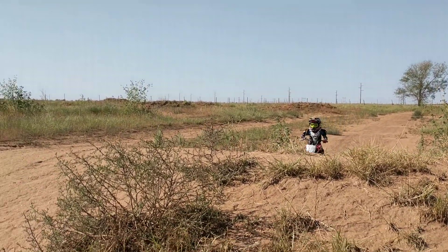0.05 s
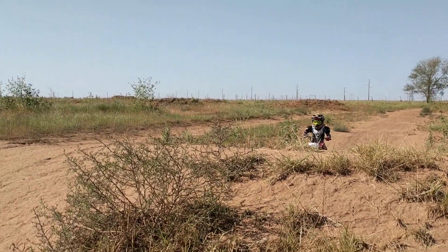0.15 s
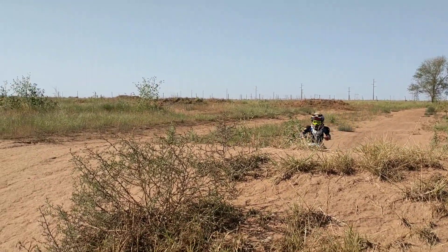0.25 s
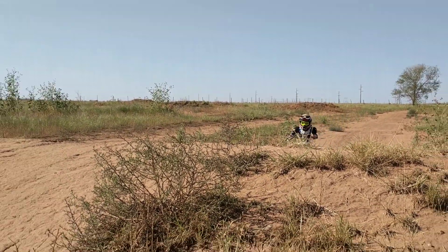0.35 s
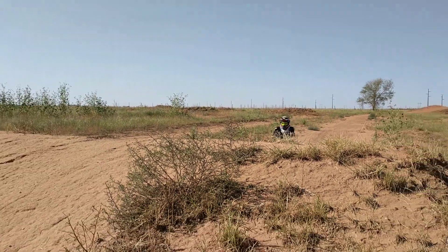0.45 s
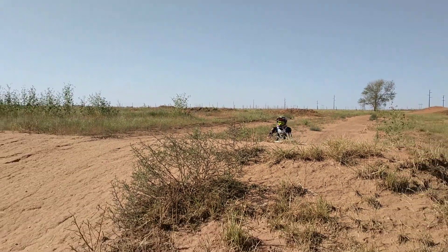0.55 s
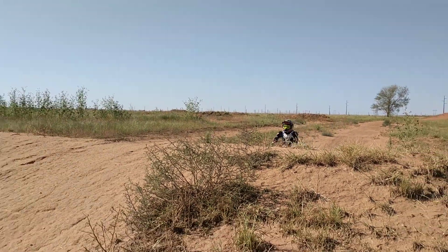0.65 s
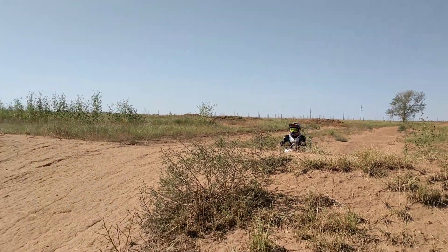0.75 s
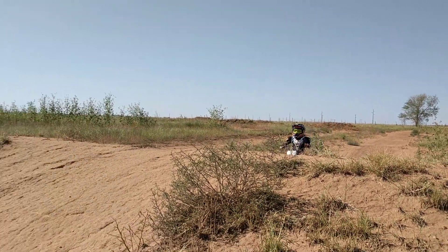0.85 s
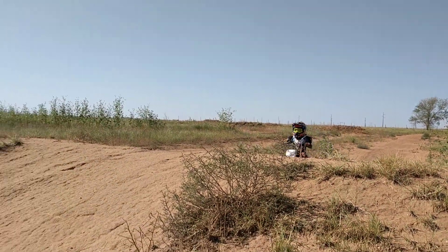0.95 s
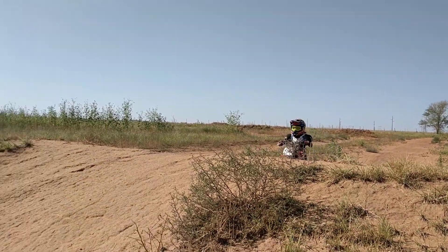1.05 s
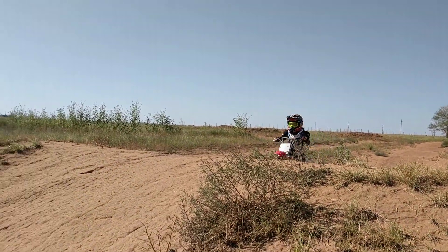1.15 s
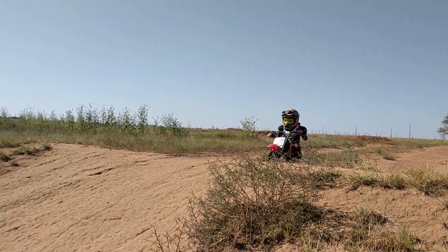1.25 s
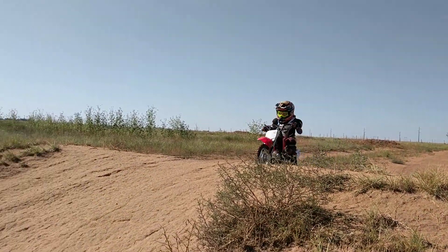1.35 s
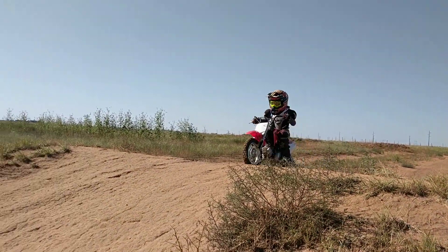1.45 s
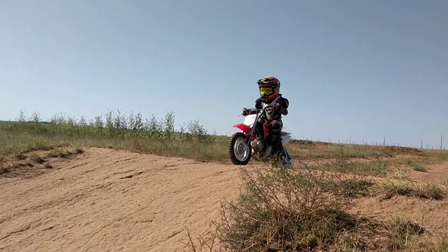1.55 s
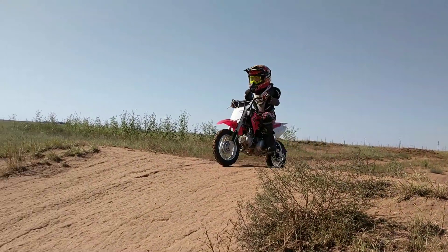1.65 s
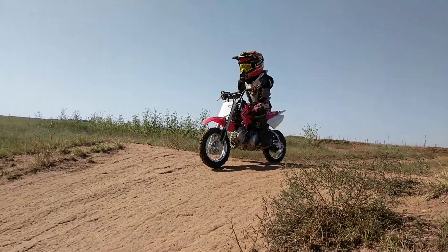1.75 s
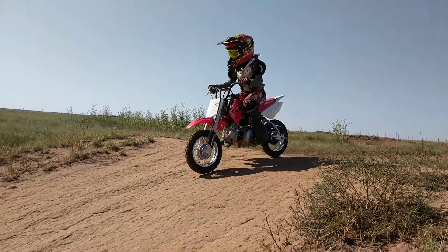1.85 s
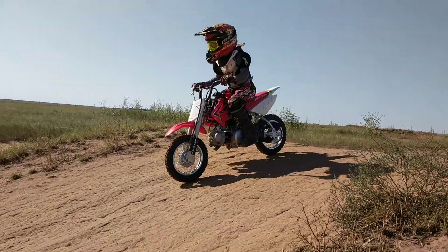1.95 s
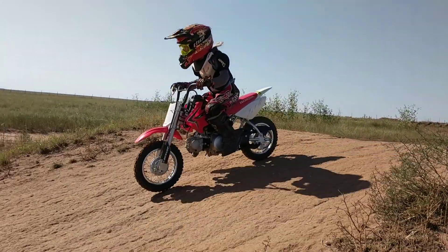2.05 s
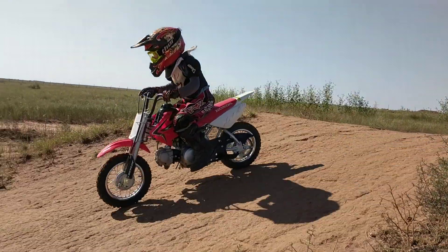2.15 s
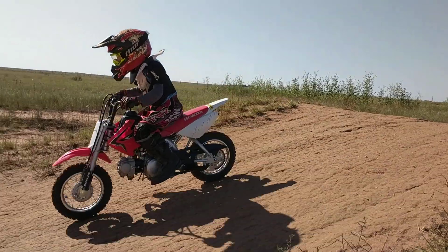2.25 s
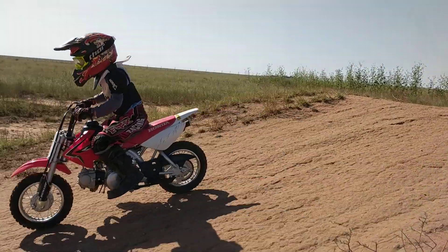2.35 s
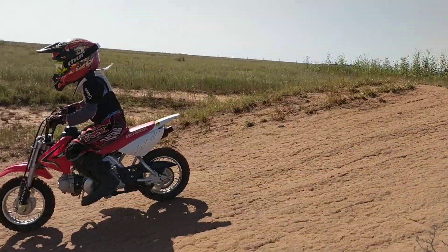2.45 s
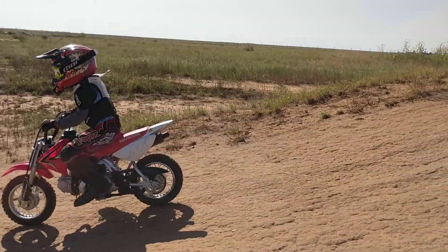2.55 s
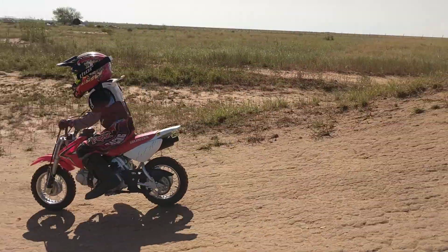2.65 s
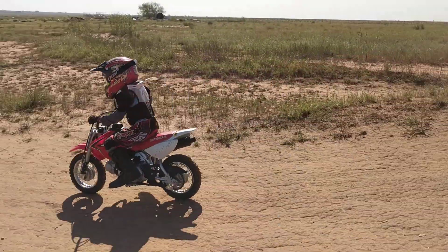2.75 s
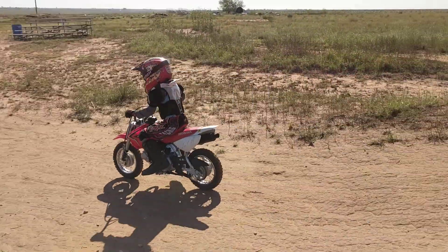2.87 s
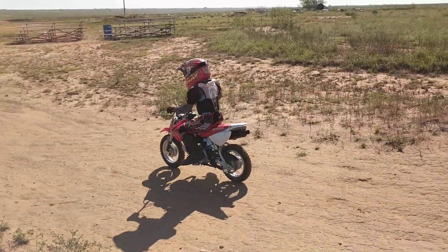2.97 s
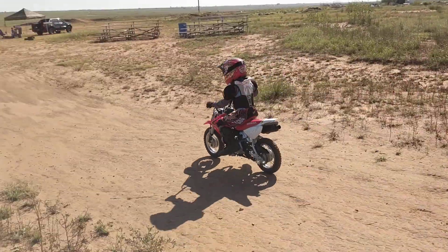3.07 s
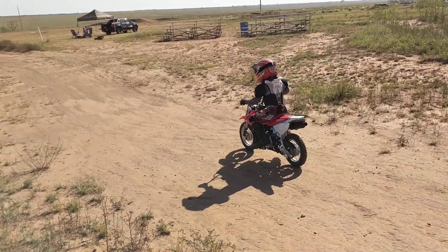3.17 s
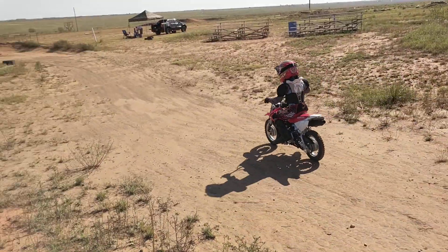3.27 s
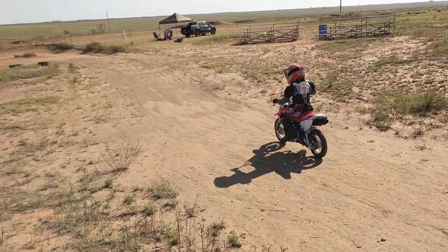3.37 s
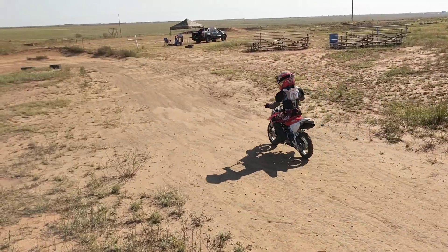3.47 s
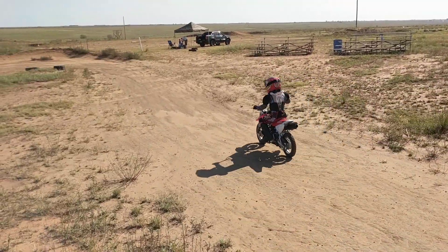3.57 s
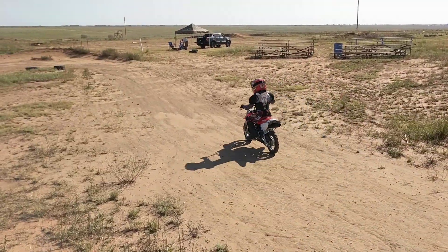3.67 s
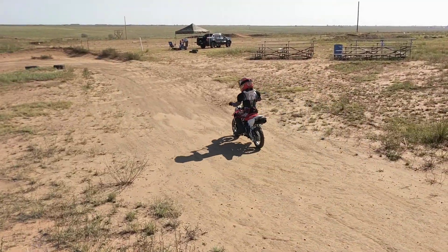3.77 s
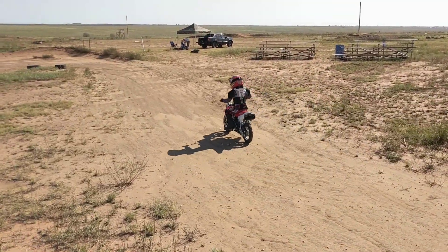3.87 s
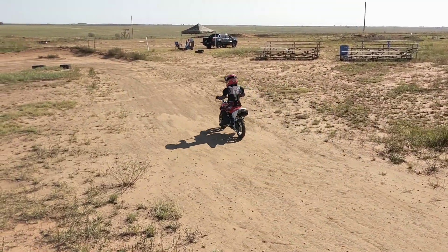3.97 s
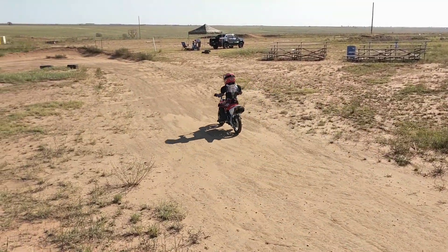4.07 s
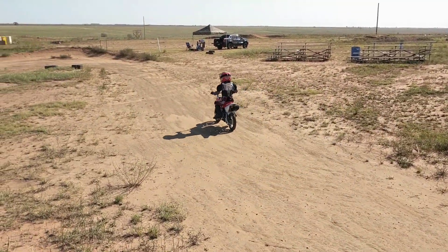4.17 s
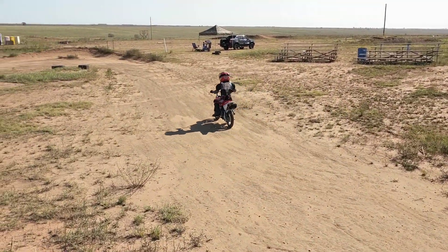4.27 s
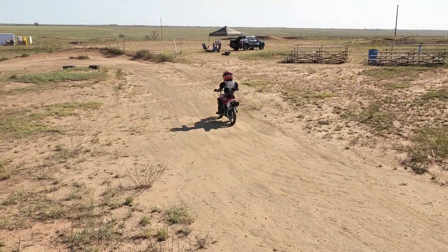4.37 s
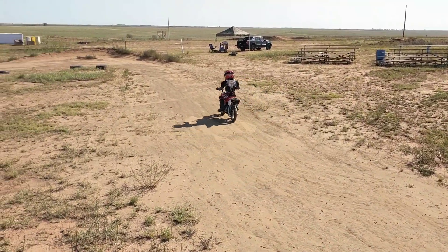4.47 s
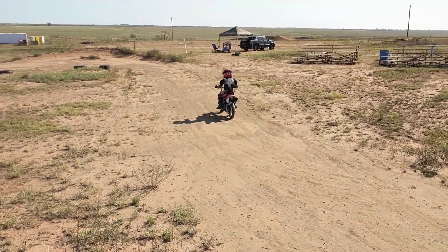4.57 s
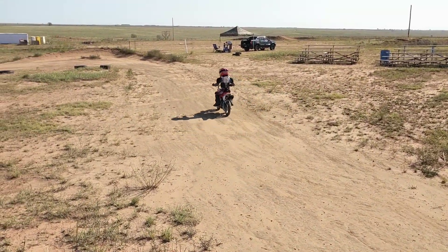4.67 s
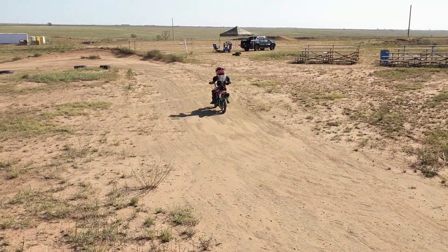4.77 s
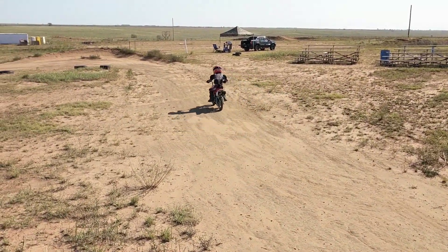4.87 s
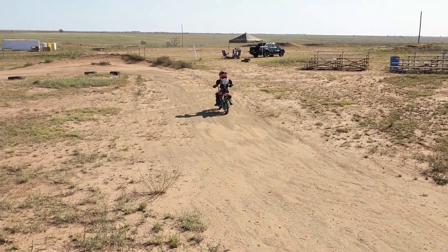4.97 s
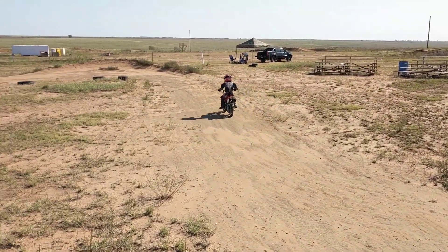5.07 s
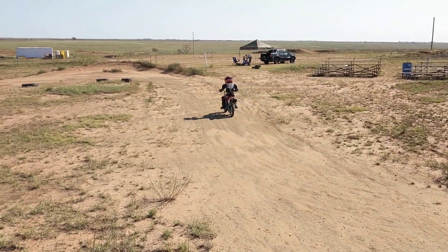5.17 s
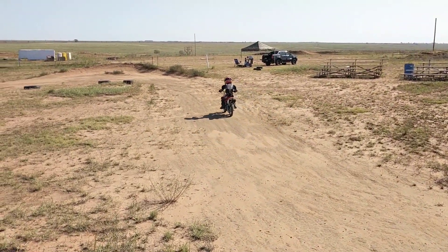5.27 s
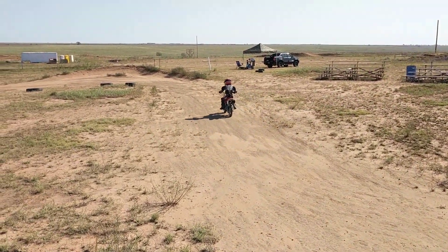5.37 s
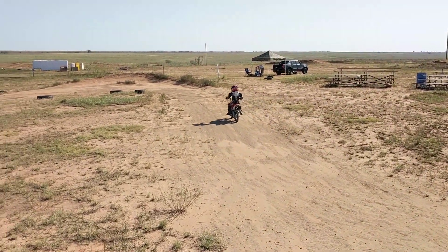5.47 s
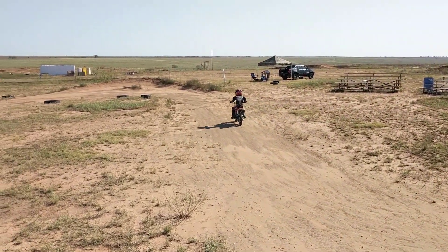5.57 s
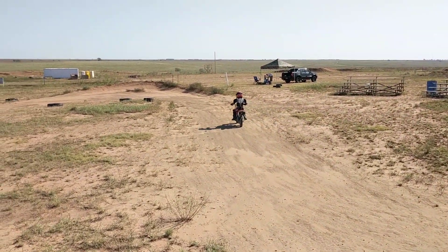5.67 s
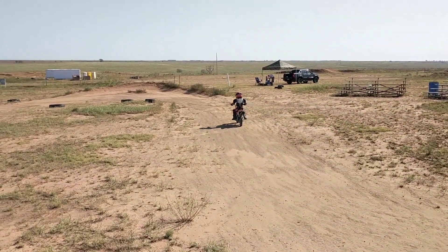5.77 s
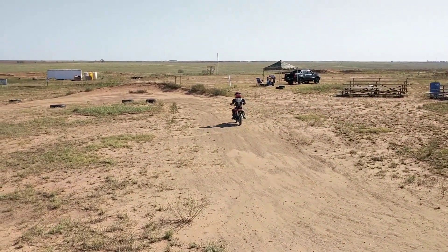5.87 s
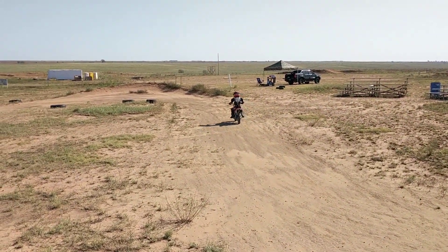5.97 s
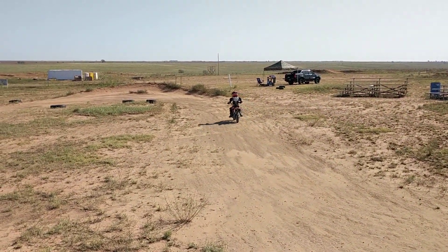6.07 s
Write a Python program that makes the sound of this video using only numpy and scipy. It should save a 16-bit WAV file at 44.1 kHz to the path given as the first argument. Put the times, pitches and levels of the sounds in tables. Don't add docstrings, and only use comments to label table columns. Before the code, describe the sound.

Outdoors on an open dirt track, a small four-stroke bike approaches with a low, fluttering boom, briefly barking under throttle. Its pitch sags as it tops the rise, then metal ring, valve clatter, chain and tyre hiss swell close by around two and a half seconds. It coasts away, slowing and misfiring, with a small late throttle blip. Wind rumbles and thumps on the handheld microphone, much heavier after the pass.

```python
import sys
import numpy as np
from scipy import signal
from scipy.fft import rfft, irfft, next_fast_len
from scipy.io import wavfile
from scipy.ndimage import uniform_filter1d, map_coordinates

SR = 44100
rng = np.random.default_rng(int(sys.argv[2]) if len(sys.argv) > 2 else 0)


def generate_wav(sig):
    pcm = np.round(np.clip(np.atleast_2d(sig).T, -1, 1) * 32767).astype(np.int16)
    wavfile.write(sys.argv[1], SR, pcm)


def ratio_of_db(decibels):
    return 10 ** (np.asarray(decibels, float) / 20)


N = 269875
T = np.arange(N) / SR


def unit(x):
    return x / np.sqrt(np.mean(x ** 2) + 1e-20)


def curves(rows):
    s, *cols = np.transpose(rows)
    return [np.interp(T, s, c) for c in cols]


def peaks(rows):
    levels = []
    for start, end, db, rise, fall in rows:
        levels.append(db - rise * np.maximum(start - T, 0) - fall * np.maximum(T - end, 0))
    return np.max(levels, axis=0)


def wobble(rate_hz):
    knots = rng.standard_normal(int(N * rate_hz / SR) + 4)
    return map_coordinates(knots, [np.arange(N) * rate_hz / SR])


def filtered(x, response):
    m = next_fast_len(N + SR // 2, True) // 2 * 2
    return irfft(rfft(x, m) * response(np.fft.rfftfreq(m, 1 / SR)), m)[:N]


def low_pass(x, hz, order):
    return filtered(x, lambda f: 1 / (1 + (f / hz) ** order))


def high_pass(x, hz, order):
    return filtered(x, lambda f: 1 / (1 + (hz / (f + 1)) ** order))


def modes(rows):
    def response(f):
        total = 0
        for k, (hz, width, db) in enumerate(rows):
            damping = 1j * f * width
            total = total + (-1) ** k * ratio_of_db(db) * damping / (hz * hz - f * f + damping)
        return total
    return response


def steep(hz, width_hz):
    return lambda f: modes([(hz, width_hz, 0)])(f) ** 2


def causal(points):
    def response(f):
        hz, db = np.transpose(points)
        cep = irfft(np.log(ratio_of_db(np.interp(np.log(f + 1), np.log(hz + 1), db)) + 1e-6))
        cep[1:len(cep) // 2] *= 2
        cep[len(cep) // 2 + 1:] = 0
        return np.exp(rfft(cep))
    return response


def noise(response):
    return unit(filtered(rng.standard_normal(N), response))


def patchy(x, depth_db):
    z = signal.stft(x, nperseg=512)[2]
    field = uniform_filter1d(rng.standard_normal(z.shape), size=6, axis=0)
    field = uniform_filter1d(field, size=8, axis=1)
    return unit(signal.istft(z * ratio_of_db(depth_db * unit(field)), nperseg=512)[1][:N])


def train(times, delay, jitter, scatter_db, level_db=0):
    chance = rng.standard_normal((len(times), 2))
    at = np.round((times + delay + jitter * chance[:, 0]) * SR).astype(int)
    return np.bincount(at, ratio_of_db(level_db + scatter_db * chance[:, 1]), N + SR)[:N]


def burst(pulses, rise, t60):
    t = np.arange(SR // 16) / SR
    shape = ratio_of_db(-60 * t / t60) * (1 - np.exp(-t / rise))
    return signal.oaconvolve(pulses, shape * np.sqrt(SR / 40) / np.linalg.norm(shape))[:N]


def struck(times, rows, delay, rise, t60, scatter_db, level_db):
    total = 0
    for hz, width_hz, db in rows:
        part = burst(train(times, delay, 0.00024, scatter_db, level_db), rise, t60)
        total = total + ratio_of_db(db) * filtered(part * rng.standard_normal(N), steep(hz, width_hz))
    return unit(total)


# t/s, firing rate/Hz
SPEED = [(0, 46.19), (.128, 45.94), (.192, 45.91), (.358, 50.25), (.524, 49.02), (.62, 47.04), (.76, 45.76),
         (.972, 42.76), (1.1, 44.17), (1.24, 43.05), (1.328, 41.4), (1.52, 39.15), (1.69, 38.99),
         (1.86, 36.55), (2.13, 41.46), (2.24, 42.32), (2.33, 41.47), (2.54, 44.6), (2.79, 45.28),
         (3.22, 42.48), (3.9, 37.91), (4.17, 33.09), (4.35, 30.79), (4.75, 30.01), (5.21, 28.3),
         (5.44, 32.81), (6.12, 28.49)]


def firings():
    turns = np.cumsum(curves(SPEED)[0]) / SR + .921
    return np.interp(np.arange(1, int(turns[-1]) + 1), turns, T)


# first t/s, last t/s, loss/dB
MISFIRES = [(.17, .17, 11.5), (.588, .588, 5), (.65, .65, 6), (.83, .83, 6), (.94, .94, 10),
            (1.17, 1.17, 4), (1.19, 1.19, 5), (2.24, 2.27, 7.5), (2.52, 2.55, 4), (2.73, 2.73, 2),
            (2.81, 2.81, 2), (3.445, 3.445, 4), (3.643, 3.643, 18), (3.668, 3.668, 3), (3.692, 3.692, 8),
            (3.743, 3.743, 5), (3.795, 3.795, 20), (3.9, 3.9, 8), (3.925, 3.925, 3), (3.954, 3.954, 8),
            (4.008, 4.008, 3), (4.066, 4.092, 10), (4.151, 4.185, 4), (4.213, 4.213, 10), (4.243, 4.275, 5),
            (4.309, 4.309, 3), (4.402, 4.402, 4), (4.468, 4.468, 22), (4.535, 4.535, 15), (4.568, 4.568, 4),
            (4.601, 4.601, 22), (4.634, 4.634, 12), (4.7, 4.735, 4), (4.8, 4.833, 16), (4.867, 4.867, 8),
            (4.969, 5.005, 3), (5.039, 5.039, 24), (5.073, 5.073, 4), (5.178, 5.178, 5), (5.214, 5.214, 20),
            (5.285, 5.285, 9), (5.627, 5.693, 10), (5.725, 5.725, 5), (5.757, 5.757, 10), (5.823, 5.856, 7),
            (5.956, 5.956, 4), (6.023, 6.058, 4)]


def misfires(times):
    return -sum(db * (times > a - .011) * (times < b + .011) for a, b, db in MISFIRES)


# t/s, gas heat (0-1), bark over boom/dB, bark edge/dB, clatter over hiss/dB
THROTTLE = [(0, 0, -14.5, 8, -1.5), (.12, 0.1, -6.5, 6, -2), (.19, 0.76, -4, 1.5, -18),
            (.44, 0.9, -1.5, -4, -21), (0.584, 0.1, -12.5, 2, -1.5), (1.09, 1, -8.5, -6, -3),
            (1.33, 0.97, -9.5, 4, -5.5), (1.739, 0.91, -9.5, 1, -5.5), (1.93, 0.97, -9.5, -13, -6),
            (2.279, 0.09, -15.5, -25, -6.5), (2.55, 0.02, -17.5, 0, -3.5), (3, 0.04, -22.5, 0, -1.5),
            (3.4, 0.07, -25, -20, -1), (4.3, 0.2, -39, -29, 1.5), (5.281, 0.5, -15, 0, 8),
            (5.6, 0, -16, -18, -5), (5.78, 0.58, -24, -1, 4)]


def throttle():
    grip_s = 0.02
    s, *cols = np.transpose(THROTTLE)
    now = np.clip(np.searchsorted(s, np.arange(N) / SR) - 1, 0, None)
    return [uniform_filter1d(c[now], size=round(grip_s * SR) + 1) for c in cols]


def late(f):
    from_hz, to_hz, lag_s = 200, 460, .006
    delay_s = np.interp(f, [from_hz, to_hz, 1.2 * to_hz], [-lag_s / 4, .6 * lag_s, lag_s / 6])
    return np.exp(-2j * np.pi * np.cumsum(delay_s) * f[1])


# t/s, level/dB
EXHAUST = [(0, -30.5), (.22, -36.5), (.4, -33.5), (.57, -43.5), (.6, -27), (1.06, -29), (1.09, -34.5),
           (1.27, -33.5), (1.34, -27.5), (1.9, -26.5), (2.16, -25.5), (2.27, -26), (2.288, -20), (3.3, -24),
           (4.1, -27), (5.2, -35), (5.32, -29.5), (6.12, -28.5)]
# f/Hz, level/dB
HOT = [(30, -56), (78, -7), (150, -12.5), (193, 0.5), (235, -19), (330, -9.5), (430, -9.5), (480, -20.5),
       (635, -11), (700, -20.5), (760, -18.5), (1000, -29), (1300, -31.5), (1900, -44.5), (2400, -45),
       (3500, -78)]
# f/Hz, level/dB
COOL = [(30, -41.5), (90, -11), (132, 0.5), (155, 6.5), (178, 3.5), (222, -11), (300, -15), (360, -15.5),
        (405, -19), (480, -38), (580, -37), (640, -41), (715, -29.5), (800, -47), (2000, -81.5)]


def exhaust(times):
    boom_db = curves(EXHAUST)[0]
    heat, bark_db, edge_db, _ = throttle()
    heat = np.clip(heat, 0, 1)
    pulses = train(times, delay=.0007, jitter=.00004, scatter_db=.6, level_db=.8 * misfires(times))
    hot, cool = causal(HOT), causal(COOL)
    total = 0
    for share, muffler in ((heat, hot), (1 - heat, lambda f: cool(f) * late(f))):
        wave = filtered(pulses, muffler)
        boom = low_pass(wave, 260, 8)
        edge = wave - low_pass(wave, 700, 8)
        bark = (wave - boom + (ratio_of_db(edge_db) - 1) * edge) / np.std(wave - boom)
        total = total + share * (ratio_of_db(boom_db) * unit(boom) + ratio_of_db(boom_db + bark_db) * bark)
    return total


# f/Hz, level/dB per Hz
RASP = [(300, -33.5), (480, 8.5), (650, -4.5), (1050, 1.5), (1400, -6.5), (2100, -7), (3200, -21.5),
        (6000, -63)]


def rasp(times):
    pulses = train(times, delay=0.0019, jitter=0.00059, scatter_db=4.0, level_db=misfires(times))
    rush = burst(pulses, rise=0.00083, t60=0.04)
    heat, bark_db, edge_db, _ = throttle()
    db = curves(EXHAUST)[0] + bark_db + edge_db - 3.1 * (1 - heat)
    return ratio_of_db(db - 16.5) * rush * noise(causal(RASP))


# t/s, peak level/dB, slope either side/dB per s
AIRBOX = [
    (.5, -64, 0),
    (1.6, -44.5, 39),
    (2.149, -37.5, 120),
    (2.45, -57, 62),
    (2.899, -47.5, 12),
]


def airbox(times):
    db = peaks([(s, s, top, slope, slope) for s, top, slope in AIRBOX])
    pulses = train(times, delay=.0065, jitter=.00003, scatter_db=1.5)
    high = unit(filtered(pulses, steep(1410, 90)))
    low = unit(filtered(pulses, steep(1270, 90)))
    share = np.interp(T, [2.74, 2.9], [1, 0])
    return ratio_of_db(db) * (share * high + (1 - share) * low)


# from t/s, to t/s, level/dB
PUFFS = [
    (5.338, 5.57, -47),
    (5.706, 5.71, -70),
]
# f/Hz, width/Hz, level/dB
JET = [(8250, 1000, 3.5), (9700, 1800, 2.5), (11400, 2600, -9), (13400, 1200, 6.5), (16200, 1000, -17)]
# f/Hz, width/Hz, level/dB
PIPE = [(2440, 940, -3.5), (2800, 300, -0.5), (4670, 1000, -8.5), (6530, 2700, -22)]
# t/s, level/dB
TICKS = [(5.2799, -33), (5.5975, -40), (5.6294, -58), (5.6444, -54), (5.66, -42), (5.692, -42),
         (5.7244, -60), (5.7563, -41.5), (5.7824, -49), (5.8134, -42), (5.8213, -43), (5.8544, -57),
         (5.888, -59), (5.9229, -61), (5.9564, -54), (5.9674, -54), (5.9893, -49), (6.0212, -47),
         (6.0574, -54), (6.0974, -58)]
# f/Hz, width/Hz, level/dB
GRIT = [(8200, 900, 0), (9600, 1300, 0), (11500, 3000, -7), (13300, 1600, -5)]


def tailpipe(times):
    open_db = peaks([(a, b, db, 500, 1307) for a, b, db in PUFFS])
    jets = struck(times, JET, delay=.0014, rise=.0003, t60=.007, scatter_db=3, level_db=0)
    ring = struck(times, PIPE, delay=0.002, rise=0.0005, t60=0.02, scatter_db=3, level_db=0)
    early = times[(times > 5.45) * (times < 5.58)] - .005
    s, db = np.transpose(TICKS)
    tick_db = np.r_[db, 0 * early - 47]
    ticks = struck(np.r_[s, early], GRIT, delay=0, rise=.0003, t60=.006, scatter_db=3, level_db=tick_db)
    return ratio_of_db(open_db) * (jets + ratio_of_db(-1.5) * ring) + ratio_of_db(-77.5) * ticks


# from t/s, to t/s, level/dB, f/Hz, width/Hz
BRANCH = [(0.014, 0.115, -54, 735, 60), (0.632, 0.857, -52.5, 587, 50), (0.865, 1.08, -52.5, 562, 50),
          (2.32, 2.517, -54.5, 558, 50), (2.62, 3.11, -53.5, 722, 70), (0.128, 0.543, -50, 683, 91.5),
          (.13, 0.557, -49, 474, 79), (1.067, 1.298, -50.5, 684, 90), (2.05, 2.277, -46, 465, 60),
          (5.294, 5.58, -49, 535, 123), (0.266, 0.512, -55.5, 1130, 201)]


def branch(times):
    pulses = train(times, delay=.003, jitter=.00004, scatter_db=.5, level_db=.8 * misfires(times))
    total = 0
    for start, end, db, hz, width_hz in BRANCH:
        line = unit(filtered(pulses, steep(hz, width_hz)))
        total = total + ratio_of_db(peaks([(start, end, db, 300, 300)])) * line
    return total


# t/s, tyre and chain hiss level/dB, shield ring level/dB
PASS = [(0, -64, -59), (.38, -58, -49.5), (.56, -61, -58), (1.03, -62, -48), (1.15, -56.5, -58),
        (1.401, -47.5, -48), (1.65, -44, -41), (1.82, -43.5, -44.5), (2.149, -42, -39), (2.38, -40, -36.5),
        (3.05, -45, -43), (3.55, -51, -37.5), (3.9, -52, -39), (4.3, -55.5, -44), (4.7, -60.5, -44.5),
        (5.25, -58, -49.5), (5.6, -58.5, -59), (6.12, -66, -60.5)]
# f/Hz, width/Hz, level/dB
RINGS = [(1512, 82, 10), (1604, 540, -12)]


def blow_level(times):
    s, _, db = np.transpose(PASS)
    return np.interp(times, s, db) + misfires(times)


def shield_ring(times):
    blow_db = blow_level(times)
    blows = train(times, delay=.0016, jitter=.0003, scatter_db=1.5, level_db=blow_db - 11)
    steady = uniform_filter1d(blows, size=SR // 8) * SR / 40
    shake = burst(blows, rise=.0012, t60=.024) + .15 * steady
    white = rng.standard_normal(N)
    exact = train(times, delay=0.0006, jitter=0.00015, scatter_db=1.2, level_db=blow_db - 3)
    n = np.arange(SR // 400)
    cycles = np.hanning(len(n)) * np.cos(2 * np.pi * 1520 * n / SR)
    exact = 36 / 27 * signal.oaconvolve(exact, cycles)[:N]

    def shield(f):
        return modes(RINGS)(f) * (1j * f / (1j * f + 1100)) ** 4 * (3500 / (1j * f + 3500)) ** 3

    return filtered(shake * white + exact, shield) / np.std(filtered(white, shield))


# f/Hz, width/Hz, level/dB
CLATTER = [(1960, 1400, -2.5), (2580, 580, -1), (3130, 140, -6.5), (3940, 5200, -12), (6010, 1100, -11.5),
           (8240, 1600, -14.5), (9700, 3000, -16.5), (14100, 4800, -20)]
# f/Hz, level/dB per Hz
HISS = [(470, -27.5), (800, -13.5), (1190, -3.5), (1530, -5.5), (1710, -6.5), (2560, -8), (4180, -16),
        (6150, -17), (14100, -28.5), (16400, -30), (17500, -59)]


def running_gear(times):
    blow_db = blow_level(times)
    weak_db = .5 * (blow_db - uniform_filter1d(blow_db, size=9))
    clatter = struck(times, CLATTER, delay=.0015, rise=.003, t60=.035, scatter_db=2.2, level_db=weak_db)
    hiss_db = curves(PASS)[0]
    bright = high_pass(clatter, 4500, 4)
    dulling = .4
    clatter = clatter + (ratio_of_db(dulling * (hiss_db - hiss_db.max()) + 2.0) - 1) * bright
    flicker_db = 0.58 * wobble(30) + 1.03 * wobble(6.4)
    hiss = ratio_of_db(hiss_db + flicker_db) * patchy(noise(causal(HISS)), depth_db=2.3)
    gear = hiss + ratio_of_db(hiss_db + throttle()[3]) * clatter
    air_db = np.interp(T, [1.02, 2.02], [-4.5, 4])
    return gear + (ratio_of_db(air_db) - 1) * high_pass(gear, 9000, 6)


# from t/s, to t/s, level/dB, f/Hz, width/Hz
PINGS = [
    (1.42, 1.52, -52, 2050, 250),
    (3.2, 3.6, -63, 4650, 280),
    (3.27, 3.6, -59.5, 3800, 240),
    (3.8, 4.05, -56.5, 2650, 330),
    (5, 5.27, -59, 2800, 350),
    (5.84, 6.12, -59, 2800, 250),
]


def pings(times):
    loss_db = 0.49 * misfires(times)
    total = 0
    for start, end, db, hz, width_hz in PINGS:
        ring = struck(times, [(hz, width_hz, 0)], delay=0.0017, rise=.0005, t60=0.012,
                      scatter_db=2.5, level_db=loss_db)
        total = total + ratio_of_db(peaks([(start, end, db, 100, 100)])) * ring
    return total


# t/s, peak
# level/dB, f/Hz
SQUEAKS = [(1.3516, -41, 8240), (1.454, -38, 9200), (1.5567, -37, 8700), (1.807, -28.5, 11160),
           (1.947, -41, 9460), (2.0771, -33, 9600), (2.1978, -31, 8800), (2.551, -30, 8500),
           (3.1122, -43, 7820), (3.1786, -44, 8400), (3.2535, -36, 8540), (3.42, -42, 8260),
           (3.4689, -41, 9700), (3.7183, -48, 8250), (3.7697, -63, 9250), (3.8236, -54, 8000),
           (3.9, -40, 8390), (4.1023, -40, 7900), (4.1838, -45, 8350), (4.2756, -62, 7400),
           (4.3745, -42, 8200), (4.4751, -48, 8900), (4.5509, -46, 8200), (4.766, -57, 7280),
           (4.8293, -46, 8400), (4.8987, -49.5, 8100), (4.9959, -44, 7250), (.806, -56, 6500),
           (.825, -29, 620), (5.5045, -37, 13200), (5.536, -35, 13100), (5.568, -42, 13400),
           (2.551, -27, 6100), (2.551, -32, 3320), (2.62, -41, 6040), (2.55, -21.5, 1120),
           (2.746, -21.5, 2500), (2.747, -27, 1940), (2.955, -31, 2110), (3.667, -43, 6500),
           (3.985, -38, 5800), (4.667, -46, 15200), (5.371, -43, 8100), (5.594, -52, 8600),
           (5.7244, -48, 8130), (5.821, -48, 8000), (5.858, -52, 16000), (6.0701, -52, 8300)]


def squeaks():
    out = np.zeros(N + SR)
    t = np.arange(SR // 25) / SR
    for s, db, hz in SQUEAKS:
        envelope = ratio_of_db(db - 1.0 - 60 * t / 0.015) * (1 - np.exp(-t / 0.00048))
        out[round(s * SR):][:len(t)] += envelope * np.sin(2 * np.pi * hz * t * (1 - 2.5 * t))
    return out[:N]


# from t/s, to t/s, level/dB, f/Hz, width/Hz
BUZZES = [
    (1.38, 1.56, -59, 2020, 260),
    (1.93, 2.1, -54, 1120, 200),
    (2.17, 2.25, -48, 3150, 300),
    (2.74, 2.81, -48, 2450, 300),
    (4.09, 4.56, -74, 8150, 330),
    (3.4, 3.65, -55, 2350, 300),
    (1.45, 2.2, -64, 9600, 1800),
]


def buzzes():
    total = 0
    for start, end, db, hz, width_hz in BUZZES:
        level_db = peaks([(start, end, db, 200, 200)]) + 4 * wobble(35)
        total = total + ratio_of_db(level_db) * noise(steep(hz, width_hz))
    return total


# t/s, level/dB
WIND = [(0, -29), (1.3, -31.5), (1.45, -37), (1.96, -44), (2.18, -27.5), (3, -26), (3.5, -25.5), (4, -24),
        (4.25, -26), (4.4, -23.5), (4.9, -28.5), (5.1, -20.5), (5.33, -29), (6.12, -20.5)]
# t/s, peak level/dB, slope either side/dB per s
GUSTS = [(0.219, -21.5, 97), (.34, -25, 154), (.4, -23, 120), (.68, -24.5, 128), (1.17, -23, 94),
         (1.67, -42, 150), (2.28, -24.5, 100), (2.52, -22.5, 110), (2.7, -35, 40), (3.119, -22.5, 108),
         (3.27, -21.5, 205), (3.371, -15, 255), (3.6, -17.5, 102), (3.731, -17.5, 191), (3.88, -18.5, 130),
         (4.03, -26, 57.5), (4.13, -16, 84), (4.41, -20, 203), (4.51, -15, 204), (4.633, -17, 196),
         (4.701, -16, 220), (4.79, -19.5, 82), (4.96, -21.5, 116), (5.209, -19.5, 69.5),
         (5.401, -16.5, 179), (5.56, -17, 151), (5.669, -16, 131), (5.85, -18, 105), (6.018, -17, 81)]
# f/Hz, level/dB per Hz
RUMBLE = [(15, -45), (25, -17.5), (58, 3.5), (145, -4.5), (201, -12.5), (249, -15), (282, -21),
          (400, -30.5), (601, -40.5), (1000, -112), (1300, -101), (2200, -120)]


def buffeting():
    gusts_db = peaks([(s, s, db, slope, slope) for s, db, slope in GUSTS])
    strength_db = np.maximum(curves(WIND)[0], gusts_db)
    flutter_db = np.interp(T, [3.2, 3.5], [-4, 0])
    lumps = ratio_of_db(0.45 * wobble(14) + 2.0 * wobble(35))
    air = noise(causal(RUMBLE))
    deep_db = np.interp(T, [2.2, 2.4], [3, -4])
    air = air + (ratio_of_db(deep_db) - 1) * low_pass(air, 48, 8)
    low = low_pass(air, 220, 6)
    crests = unit(np.abs(uniform_filter1d(low ** 2, size=SR // 80)) ** 0.32)
    return ratio_of_db(strength_db + 0.5) * unit(lumps * (low + ratio_of_db(flutter_db) * crests * (air - low)))


# t/s, peak level/dB, length/s
SLAPS = [(0.825, -43, .008), (.829, -37, .006), (0.937, -39.5, .006), (1.165, -47, .0075),
         (2.553, -35, .0096), (3.37, -31, 0.0044), (3.373, -32, 0.0046), (3.384, -49, .005),
         (3.499, -41, .0064), (3.586, -45, .008), (3.597, -37, .008), (3.604, -41, .008),
         (3.63, -47, 0.0087), (3.739, -44, .006), (3.748, -37.5, .0073), (4.04, -33.5, .004),
         (4.043, -36, .005), (4.168, -45, 0.0046), (4.173, -38, 0.0055), (4.178, -32, 0.0048),
         (4.183, -34, .006), (4.188, -45, .006), (4.407, -50, 0.0058), (4.414, -44, .0066),
         (4.508, -38, 0.0066), (4.573, -39, .0082), (4.59, -42, .006), (4.731, -38, .005),
         (4.779, -29, .003), (4.782, -35.5, .004), (4.796, -37, .004), (4.802, -33, .004),
         (4.816, -37, .004), (4.825, -32, 0.0026), (4.831, -26, 0.006), (4.861, -41.5, .006),
         (5.654, -31.5, 0.0036), (5.691, -33, 0.0064), (5.718, -46, 0.0045), (5.923, -37, 0.0036),
         (5.959, -37, .005), (5.968, -33, .004), (6.023, -31, 0.0042)]
# f/Hz, level/dB
SLAP = [(40, -40), (150, 4.5), (400, -0.5), (800, -12.5), (1200, -24.5), (2500, -88), (5000, -115)]


def wind_slaps():
    slaps = np.zeros(N + SR)
    for s, db, length_s in SLAPS:
        u = np.arange(SR // 25) / SR / length_s
        eddy = np.exp(-u * 2.4) * rng.standard_normal(len(u)) * (rng.random(len(u)) < .008)
        eddy[0] = 1
        slaps[round(s * SR):][:len(u)] += ratio_of_db(db + 43.5) * eddy
    return filtered(slaps[:N], causal(SLAP))


# f/Hz, level/dB per Hz
FIELD = [(400, -35), (600, -1), (850, -20), (1210, -33), (1540, -8.5), (2100, -18), (2510, -21.5),
         (3400, -21), (3800, -33.5), (10300, -31.5), (11200, -53), (14000, -38), (15700, -40), (17300, -57),
         (18000, -81)]


def field():
    return ratio_of_db(-61) * noise(causal(FIELD))


def scene():
    times = firings()
    engine = exhaust(times) + rasp(times) + airbox(times) + tailpipe(times) + branch(times)
    metal = shield_ring(times) + running_gear(times) + pings(times) + squeaks() + buzzes()
    return (engine + metal + buffeting() + wind_slaps() + field())[None]


def top_cut(x):
    return signal.sosfilt(signal.butter(12, 18250, fs=SR, output="sos"), x)


def record(dry):
    cut = filtered(dry[0], lambda f: (1j * f / (1j * f + 34)) ** 3)
    soft = cut / (1 + np.abs(cut / .34) ** 6) ** (1 / 6)
    end_s = .004
    soft = soft * np.clip(np.arange(N, 0, -1) / SR / end_s, 0, 1)
    mix = low_pass(soft, 17800, 60)
    return top_cut(mix[None])


dry = scene()
out = record(dry)
generate_wav(out)
```